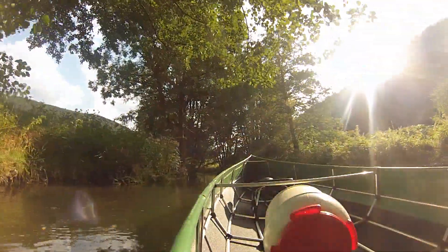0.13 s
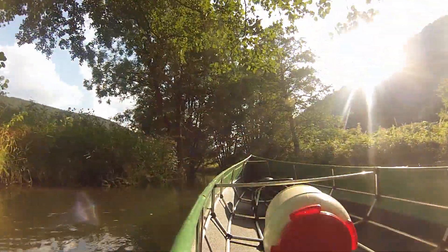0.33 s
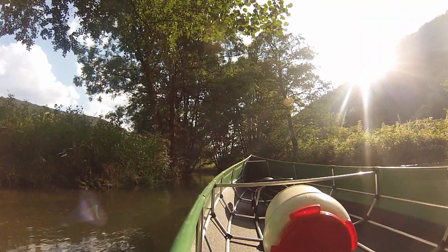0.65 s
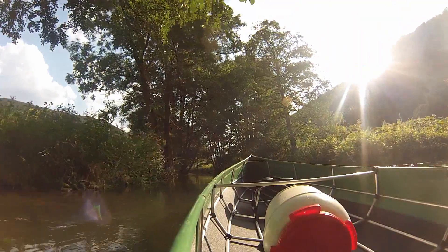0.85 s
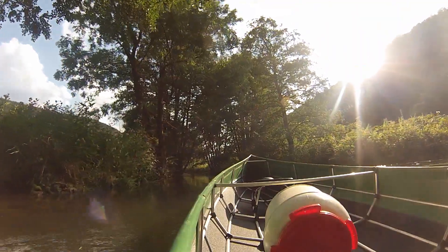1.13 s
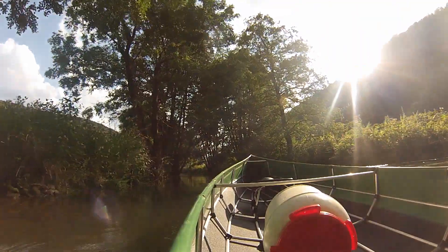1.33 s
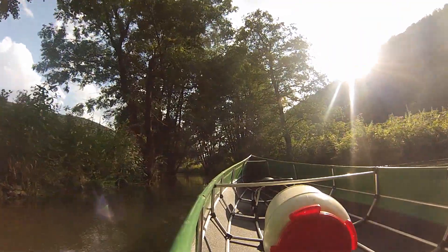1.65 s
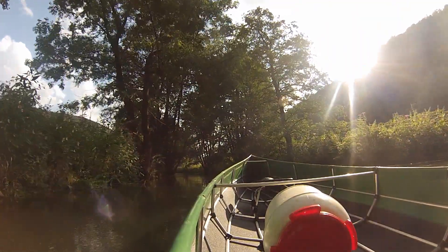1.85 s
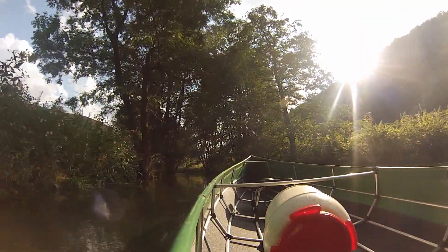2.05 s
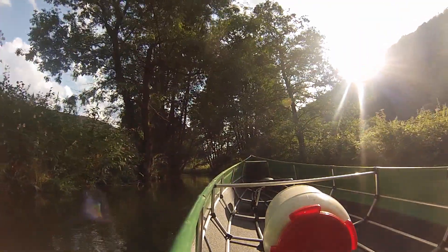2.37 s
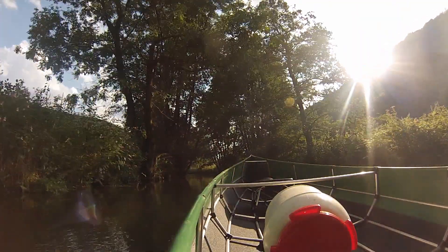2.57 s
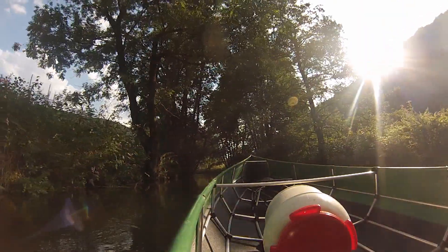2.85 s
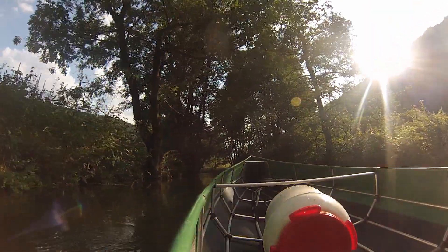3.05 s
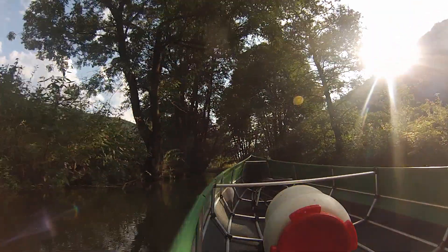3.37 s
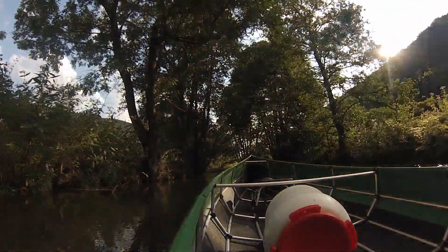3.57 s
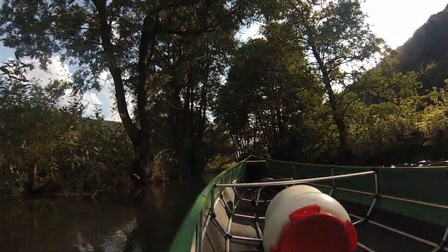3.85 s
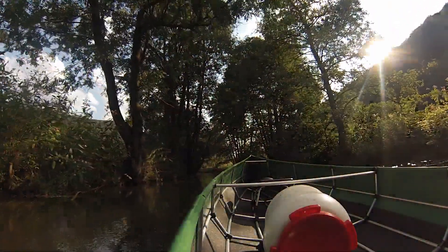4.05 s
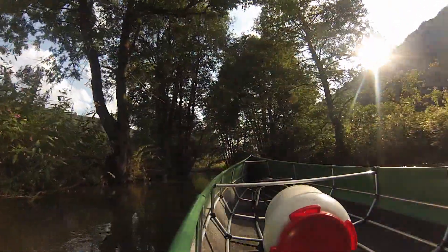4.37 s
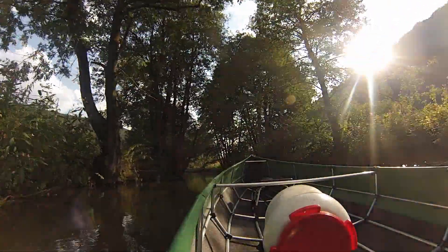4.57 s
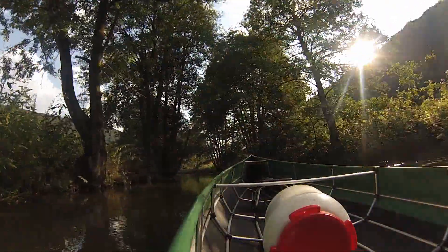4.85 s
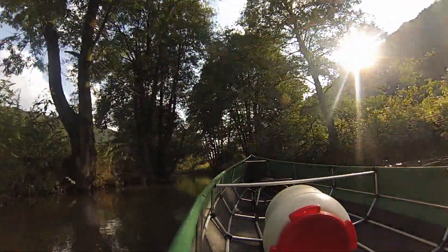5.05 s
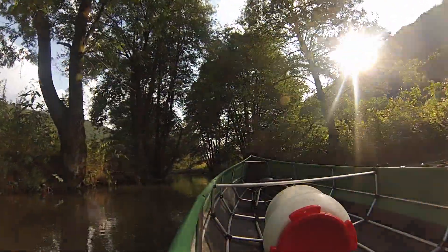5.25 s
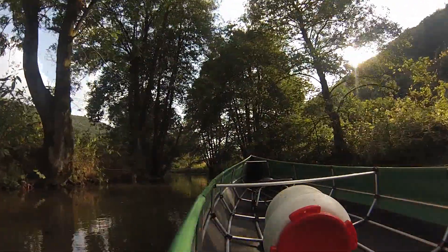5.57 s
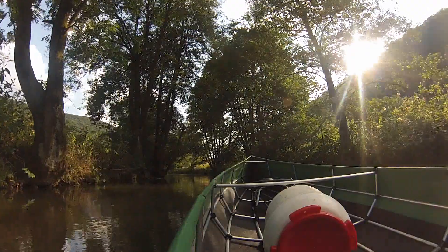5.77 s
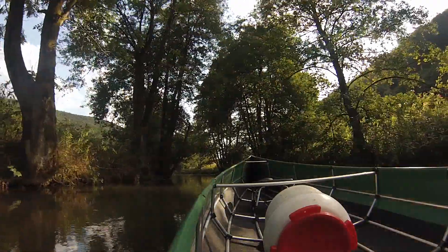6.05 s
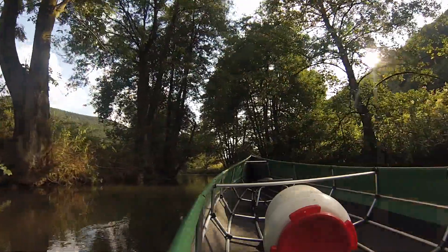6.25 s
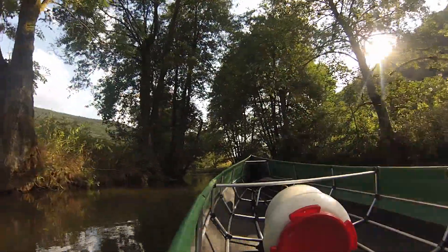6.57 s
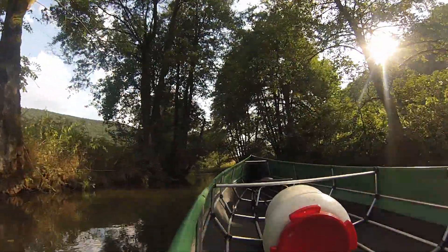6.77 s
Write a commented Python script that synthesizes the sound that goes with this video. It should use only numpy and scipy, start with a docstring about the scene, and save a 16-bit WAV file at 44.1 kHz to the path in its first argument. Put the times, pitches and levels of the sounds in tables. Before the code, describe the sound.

Over a faint steady hiss, a hollow boat flexes with deep rumbling shudders and watery booms. Small dry ticks, brief creaks, bubble plips and light paddle splashes come irregularly. The paddle raps the hull sharply around three seconds, then quieter water follows, and a heavier dull knock lands near the end as a distant motor's throbbing hum swells. The microphone sits in the boat, outdoors on a calm river.

```python
"""A faint steady hiss opens the scene, with a canoe flexing on a calm river and water washing along it.
Shoves of water boom in its bottom, fittings tick and creak, bubbles plip and the blade swishes.
The paddle gives the hull two loud knocks among fainter ones; a far engine hums and slowly grows louder.
Boat sounds are ringing modes set off by blows, contacts or slips; water and hiss are coloured noise.
The engine adds exhaust lines to a throbbing whirr."""
import sys
import numpy as np
from scipy import signal
from scipy.fft import rfft, irfft, next_fast_len
from scipy.io import wavfile
from scipy.ndimage import map_coordinates

SR = 44100
rng = np.random.default_rng(int(sys.argv[2]) if len(sys.argv) > 2 else 0)


def file_out(sig):
    """Save sig as 16-bit WAV at sys.argv[1]."""
    # one column per channel
    cols = np.atleast_2d(sig).T
    # limit, then scale
    lim = np.clip(cols, -1, 1)
    pcm = np.round(lim * 32767).astype(np.int16)
    wavfile.write(sys.argv[1], SR, pcm)


N = 305172  # length of the scene in samples


def amp(db):
    """Decibels to gain."""
    return 10 ** (np.asarray(db) / 20)


def unit(x):
    """Scale to rms 1."""
    return x / np.sqrt(np.mean(x ** 2) + 1e-20)


def clock(count):
    """Seconds for a run of samples."""
    return np.arange(count) / SR


def curves(rows):
    """One value per sample for each column after the time."""
    seconds, *columns = np.transpose(rows)
    return [np.interp(clock(N), seconds, column) for column in columns]


def colour(points, hz):
    """Gain of (Hz, dB) points joined on a log frequency axis."""
    point_hz, db = np.transpose(points)
    return amp(np.interp(np.log(hz + 1), np.log(point_hz + 1), db))


def resonances(modes, hz):
    """Causal response of (Hz, width in Hz, dB) resonances."""
    return sum(amp(db) * 1j * hz * width / (centre ** 2 - hz ** 2 + 1j * hz * width)
               for centre, width, db in modes)


def band(hz, centre_hz, share):
    """A steep-sided band from a squared resonance, whose width is a share of its centre."""
    return resonances([(centre_hz, share * centre_hz, 0)], hz) ** 2


def filtered(x, response):
    """Shape x by a response of frequency."""
    size = next_fast_len(len(x) + SR // 4)  # spare room for the ringing
    spectrum = rfft(x, size) * response(np.fft.rfftfreq(size, 1 / SR))
    return irfft(spectrum, size)[:len(x)]


def noise(response):
    """Coloured noise of rms 1."""
    return unit(filtered(rng.standard_normal(N), response))


def wobble(rate):
    """A smooth random curve, rate knots a second."""
    knots = rng.standard_normal(int(N * rate / SR) + 4)
    return map_coordinates(knots, [clock(N) * rate])


def add(track, s, sound):
    """Mix a sound in at time s."""
    start = max(round(s * SR), 0)
    track[start:start + len(sound)] += sound[:max(N - start, 0)]


def ring(modes, cutoff_hz, rise_cycles, detune):
    """One blow: modes swell within about a cycle and die; soft contact spares the high ones."""
    t, out = clock(SR // 2), 0
    for k, (hz, db, t60) in enumerate(modes):
        strength = amp(db + rng.normal()) / np.hypot(1, (hz / cutoff_hz) ** 2)
        swell = 1 - np.exp(-t * hz / rise_cycles)
        phase = 2 * np.pi * hz * (1 + detune * rng.normal()) * t
        sign = (-1) ** k  # neighbouring modes start in opposite directions
        out = out + sign * strength * swell * amp(-60 * t / t60) * np.sin(phase)
    return out


# Colour of the steady hiss. Each row: frequency in Hz, relative density in dB per Hz.
HISS_COLOUR = [(150, 5), (250, -0.5), (320, -2.5), (380, 13.5), (480, -7), (850, -1), (1250, 1.5),
               (1520, -2), (1750, -3), (2400, -6.5), (4000, -8.5), (8000, -12), (12500, -13)]


def hiss():
    """Steady coloured noise, a faint floor under everything."""
    return amp(-77.5) * noise(lambda hz: colour(HISS_COLOUR, hz))


# Pushes that set the whole boat flexing.
# Each row: start in seconds, level in dB, rise in seconds, decay t60 of the flexing in seconds.
PUSHES = [(0.0, -54, 0.051, .65), (.38, -61.5, 0.088, 0.78), (.75, -41, .11, 1.2),
          (1.181, -34, 0.016, 1.44), (2.045, -34.5, 0.026, 1.01), (2.78, -45.5, 0.29, 1.2),
          (3.11, -33, 0.053, 1.33), (3.3, -40, .05, 1.46), (4.2, -50, 0.076, 0.83), (4.68, -61.5, .08, .9),
          (5.5, -57, 0.13, 1), (6.2, -52, 0.15, 0.87), (6.466, -35, 0.076, 0.83)]
# Colour of the water along the hull. Each row: frequency in Hz, relative density in dB per Hz.
WASH_COLOUR = [(25, -9), (60, 2), (110, 3.5), (200, -5.5), (380, -12.5), (600, -14.5), (1200, -38.5),
               (4000, -82)]
FLEX_HZ, FLEX_IDLE_DB = 27.84, -71.5  # mean bending pitch; typical level on the calm current
TWIST_HZ, TWIST_DB, TWIST_T60_S = 44, -2, 0.21  # short-lived second mode; level relative to the push
TWIST_RISE_S = 0.027  # pushes rising slower than this hardly excite the twist
WASH_IDLE_DB, WASH_FOLLOW_DB = -72.5, -33  # wash at rest; wash relative to the flexing


def sway(s, rise_s, t60):
    """Envelope of one push: a straight rise, then a free decay."""
    t = clock(N) - s
    return np.clip(t / rise_s, 0, 1) * amp(-60 * np.maximum(t - rise_s, 0) / t60)


def swing(hz):
    """A boat mode as a sine of rms 1 whose pitch wanders by about 3 percent."""
    phase = 2 * np.pi * np.cumsum(hz * (1 + 0.0308 * wobble(5.9))) / SR
    return np.sqrt(2) * np.sin(phase)


def shudder():
    """Each push bends the whole boat, an abrupt one also twists it; water washes along the hull."""
    idle = amp(FLEX_IDLE_DB + 3.2 * wobble(7.3))
    power, twist = idle ** 2, 0
    for s, db, rise_s, t60 in PUSHES:
        power = power + (amp(db) * sway(s, rise_s, t60)) ** 2
        abruptness = 1 / np.hypot(1, rise_s / TWIST_RISE_S)
        twist = twist + amp(db + TWIST_DB) * abruptness * sway(s, rise_s, TWIST_T60_S)
    flex = np.sqrt(power)
    lapping = amp(2 * wobble(12))
    wash = noise(lambda hz: colour(WASH_COLOUR, hz)) * lapping
    wash_level = amp(WASH_IDLE_DB) + amp(WASH_FOLLOW_DB) * flex
    return flex * swing(FLEX_HZ) + twist * swing(TWIST_HZ) + wash * wash_level


# Pace of the engine. Each row: time in seconds, mean firings a second.
FIRING = [(0, 43), (5.3, 43), (5.8, 42.3), (6.92, 41.9)]
# Level of the exhaust hum. Each row: time in seconds, level in dB.
EXHAUST_LEVEL = [(0, -93), (3.5, -80.5), (4.2, -73), (4.8, -69.5), (5.35, -66), (5.8, -61), (6.3, -57),
                 (6.92, -53.5)]
# Exhaust lines. Each row: multiple of the firing rate, relative level in dB.
EXHAUST_LINES = [(1, -12.5), (2, -4), (3, 1.5), (4, -22.5), (6, -27), (7, -34), (9, -25.5), (10, -33.5),
                 (11, -31.5)]
# Level of the whirr. Each row: time in seconds, level in dB.
WHIRR_LEVEL = [(0, -86.5), (2.5, -78), (3.8, -80), (4.5, -76), (5.2, -70.5), (5.55, -66.5), (6, -68),
               (6.3, -68.5), (6.92, -65)]
# Broad colour of the whirr. Each row: frequency in Hz, relative density in dB per Hz.
WHIRR_COLOUR = [(100, 5), (250, -8), (450, -7.5), (750, -16.5), (1250, -10), (1550, -4.5), (2100, -9),
                (2800, -14), (4200, -20.5), (6500, -25.5), (9000, -34), (13000, -40)]
# Resonances of the whirr. Each row: frequency in Hz, width in Hz, dB relative to the broad colour.
WHIRR_PEAKS = [(1533, 126, 7), (2370, 150, 4.5), (2900, 77, -2.5), (3585, 190, 6), (5030, 190, 7.5),
               (6150, 240, 6)]


def engine():
    """A far engine: low exhaust lines and a whirr that throbs with every firing."""
    rate, = curves(FIRING)
    hum_db, = curves(EXHAUST_LEVEL)
    whirr_db, = curves(WHIRR_LEVEL)
    phase = 2 * np.pi * np.cumsum(rate * (1 + 0.0019 * wobble(7.8))) / SR
    hum = 0
    for multiple, db in EXHAUST_LINES:
        line = np.sin(round(multiple) * phase + rng.uniform(0, 2 * np.pi))
        hum = hum + amp(db + 0.36 * wobble(5)) * np.sqrt(2) * line
    whirr = noise(lambda hz: colour(WHIRR_COLOUR, hz)
                  * np.hypot(1, np.abs(resonances(WHIRR_PEAKS, hz))))
    throb = unit(1 + .7 * ((1 + np.cos(phase)) / 2) ** 4)  # one narrow pulse per firing
    return amp(hum_db) * hum + amp(whirr_db + 1.27 * wobble(14)) * throb * whirr


# Water shoving the bottom. Each row: start in seconds, level in dB, base pitch in Hz, base t60 in seconds.
THUMPS = [(0.122, -56.5, 150, .08), (0.738, -59, 135, 0.12), (0.869, -39, 114.4, 0.087),
          (1.191, -36, 104, 0.11), (1.232, -36.5, 115.5, 0.11), (2.059, -38, 87.6, 0.12),
          (2.101, -39, 105.5, 0.13), (2.532, -39.5, 126.6, 0.066), (3, -39.5, 109.5, 0.064),
          (3.123, -34.5, 134, 0.12), (3.192, -55.5, 152, 0.2), (3.337, -35.5, 133.6, 0.14),
          (3.381, -33, 135, 0.066), (4.159, -56.5, 253, 0.1), (4.625, -63.5, 253, 0.21),
          (5.099, -50, 109.5, 0.092), (6.473, -36.5, 149, 0.11), (6.522, -33, 109.7, 0.17)]
# The wet bottom panels. Each row: multiple of the base pitch, relative level in dB, multiple of the base t60.
BOTTOM = [(.42, -2, 2), (0.681, -7.5, 2.8), (1, 3, 1.27), (1.249, -2.5, 0.52), (1.6, -8, 1.02),
          (2.399, -19.5, 1.2)]


def thumps():
    """Each shove of water booms in the bottom, whose pitch and ring vary with the water load."""
    out = np.zeros(N)
    for s, db, hz, t60 in THUMPS:
        modes = [(hz * ratio, level, t60 * share) for ratio, level, share in BOTTOM]
        add(out, s, amp(db) * ring(modes, cutoff_hz=490, rise_cycles=0.46, detune=0.072))
    return out


# Ticks of fittings and drops on the boat.
# Each row: start in seconds, level in dB, centre in Hz, gain of the bright snap band in dB.
TICKS = [(0.1227, -51, 1900, -9), (.5435, -62, 1680, -21), (0.6061, -61, 1650, -24),
         (.738, -61, 1970, -3.5), (.8026, -64, 1900, -14), (.821, -52.5, 1880, -10),
         (0.852, -60, 1900, -14), (.872, -63, 1930, -16), (.891, -63.5, 1830, -16),
         (1.1687, -67.5, 1310, -20), (1.1979, -46, 1770, -24), (1.237, -69, 2180, -12),
         (1.246, -64, 2100, -11), (1.5133, -52.5, 1260, -11), (1.535, -54, 1250, -7),
         (1.554, -67, 1190, -20), (1.5724, -65, 1160, -18), (1.684, -72, 2500, -17),
         (1.7264, -68, 1140, -20), (2.0656, -50.5, 1550, -14), (2.5333, -57.5, 1670, -10),
         (2.9978, -56.5, 2100, -17), (3.3267, -58, 1300, -9), (3.3405, -56, 2080, 2),
         (3.354, -57, 2300, -7), (3.3832, -58.5, 2330, -14), (3.393, -60, 2210, -13),
         (3.453, -63.5, 1600, -17), (3.5848, -61.5, 1095, -22), (3.6245, -65, 1170, -22),
         (3.8151, -63, 2190, -20), (3.8416, -60, 2150, -8), (4.1557, -51.5, 1120, -16),
         (5.0825, -51, 1460, -7.5), (5.3042, -59.5, 1560, -6), (6.4656, -56.5, 1470, 1),
         (6.522, -53.5, 2320, -11), (6.5352, -56.5, 2400, -12), (6.8292, -62, 1850, -23)]
# The rail and its fittings, also rung by creaks and spray.
# Each row: frequency in Hz, width in Hz, relative level in dB.
RAIL = [(1066, 90, 5.5), (1265, 114, 10), (1479, 68, 10), (1840, 114, 8.5), (2040, 110, 4.5),
        (2333, 67, -4), (2840, 62, -21), (3300, 200, -6), (4640, 430, -40.5)]
TICK_T60_S = 0.026  # how fast the contacts of one tick die away
STRAY_DB, STRAY_HZ, STRAY_SNAP_DB = -74, 1470, -16  # typical faint tick at a random moment


def ticks():
    """Tiny clusters of contacts ring the rail; the level is their energy spread over 5 ms."""
    out, t = np.zeros(N), clock(SR // 8)
    strays = []
    for place in rng.random(size=10):
        stray_db = STRAY_DB + 2 * rng.normal()
        stray_hz = STRAY_HZ * np.exp(0.22 * rng.normal())
        strays.append((place * N / SR, stray_db, stray_hz, STRAY_SNAP_DB))
    for s, db, centre_hz, snap_db in TICKS + strays:
        def body(hz):
            """The rail, struck in a main band and a bright snap band."""
            snap = amp(snap_db) * band(hz, 4340, share=0.31)
            return resonances(RAIL, hz) * (band(hz, centre_hz, share=0.97) + snap)
        contacts = rng.standard_normal(len(t)) * amp(-60 * t / TICK_T60_S)
        tick = filtered(contacts, body)
        add(out, s, amp(db) * tick / np.linalg.norm(tick) * np.sqrt(.005 * SR))
    return out


# Stick-slip creaks, one list each. Each row: time in seconds, mean slips a second, relative level in dB.
CREAKS = [
    [(.312, 46, -56), (.36, 44, -63), (.378, 49, -53.5), (.41, 124, -57.5), (.47, 125, -56),
     (.505, 65, -54), (.53, 45, -57)],
    [(2.882, 215, -66), (2.9, 380, -53.5), (2.912, 259, -53.5)],
    [(4.187, 68, -64), (4.255, 82, -54.5), (4.3, 110, -75)],
    [(4.553, 91, -64), (4.585, 82, -50.5), (4.61, 93, -68)],
]
# Where each creak rings most, in the same order: centre in Hz.
CREAK_HZ = [1645, 2330, 1050, 1050]


def creaks():
    """A fitting under load slips in quick, nearly regular jerks that ring the rail."""
    out, t = np.zeros(N), clock(N)
    for rows, centre_hz in zip(CREAKS, CREAK_HZ):
        rate, db = curves(rows)
        active = (t >= rows[0][0]) & (t <= rows[-1][0])
        uneven = amp(.5 * wobble(50))
        count = np.ceil(np.cumsum(active * rate * uneven) / SR)
        slips = np.diff(count, prepend=0) * amp(db + 1.1 * wobble(120))  # one impulse per slip
        out += filtered(slips, lambda hz: resonances(RAIL, hz) * band(hz, centre_hz, share=0.5))
    return amp(25.5) * out


# Bubbles. Each row: start in seconds, level in dB, starting pitch in Hz, t60 in seconds.
BUBBLES = [(0.34, -53.5, 1600, 0.035), (0.7267, -52.5, 1190, 0.026), (2.141, -64, 1520, .04),
           (3.3399, -50, 1930, 0.022), (3.354, -49, 1910, 0.033), (3.363, -45, 1380, 0.014),
           (3.375, -38, 1800, 0.014), (3.396, -49, 1830, 0.027), (3.976, -61.5, 1790, .06),
           (5.099, -54, 1260, 0.034), (6.522, -50, 1920, 0.025), (6.5368, -40.5, 1854, 0.029)]


def bubbles():
    """Trapped air rings and rises in pitch as it nears the surface."""
    out, t = np.zeros(N), clock(SR // 8)
    for s, db, hz, t60 in BUBBLES:
        pitch = hz * (1 + 0.069 * np.minimum(t / t60, 1))
        phase = 2 * np.pi * np.cumsum(pitch) / SR
        onset = 1 - np.exp(-t / 0.0011)
        add(out, s, np.sqrt(2) * amp(db - 60 * t / t60) * onset * np.sin(phase))
    return out


# The blade swishing through water. Each row: middle in seconds, spray level in dB,
# half-length in seconds, spray centre in Hz, slosh in dB relative to the spray.
SWISHES = [(0.757, -75, 0.057, 1320, 5.5), (1.04, -77.5, 0.052, 1730, -15), (1.23, -69.5, 0.028, 2080, 3.5),
           (2.05, -65.5, 0.045, 1770, -6), (2.095, -65, 0.041, 1970, 3.5), (2.765, -74.5, 0.11, 1280, -24),
           (3.018, -70, 0.012, 3080, 0), (3.096, -68, 0.0062, 1650, 0.5), (3.357, -71, 0.038, 2350, 5.5),
           (3.954, -81, 0.19, 1870, 2.5), (4.229, -79.5, 0.08, 1878, 9.5), (4.653, -73.5, 0.059, 1600, 0.5),
           (5.465, -65.5, 0.036, 1620, 0.5)]
# Water against the hull. Each row: frequency in Hz, width in Hz, relative level in dB.
SLOSH = [(230, 44, -1.5), (377, 82, 2.5), (617, 28, -1)]


def swishes():
    """The blade tears the surface: droplets patter on the rail and the hull sloshes under them."""
    out = np.zeros(N)
    t = clock(SR // 2) - .25  # seconds from the middle of the swish
    for s, db, half, centre_hz, slosh_db in SWISHES:
        def patter(hz):
            """Droplets heard directly and through the rail, softened at the top."""
            rail = 0.41 + np.abs(resonances(RAIL, hz))
            return band(hz, centre_hz, share=0.95) * rail / (1 + (hz / 4800) ** 4)
        swell = np.exp(-(t / half) ** 2)
        drops = rng.standard_normal(len(t)) * (rng.random(len(t)) < 900 / SR)  # about 900 a second
        spray = unit(filtered(drops, patter))
        slosh = unit(filtered(rng.standard_normal(len(t)),
                              lambda hz: resonances(SLOSH, hz) / (1 + (hz / 1200) ** 2)))
        add(out, s + t[0], amp(db) * swell * (spray + amp(slosh_db) * slosh))
    return out


# Paddle against the hull. Each row: start in seconds, level in dB, contact cut-off in Hz (high = hard),
# ring length (1 = free hull), off-centre tilt in dB.
KNOCKS = [(2.534, -54.5, 1500, 0.85, 1), (2.9973, -57, 1810, 0.66, -3), (3.1188, -27, 1970, 0.97, 2),
          (4.158, -52, 2500, 0.46, -4.5), (5.098, -60.5, 1400, 1, 2.5), (6.4669, -23, 700, 1, 0.5)]
# The hull's ring. Each row: mean frequency in Hz, mean relative level in dB, t60 of the free hull in seconds.
HULL = [(247, -9.5, 0.14), (372.4, 1.5, 0.094), (506.6, -1, 0.095), (663, -9.5, 0.061), (1025, -4, 0.017),
        (1266, -2.5, 0.031), (1560, -29, .045), (1760, -13.5, 0.037), (2200, -25, 0.028),
        (2430, -24.5, 0.032)]


def knocks():
    """The paddle shaft strikes the hollow hull; an off-centre blow favours every other mode."""
    out = np.zeros(N)
    for s, db, cutoff_hz, length, side_db in KNOCKS:
        modes = [(hz, level - (-1) ** k * side_db, t60 * length)
                 for k, (hz, level, t60) in enumerate(HULL)]
        add(out, s, amp(db) * ring(modes, cutoff_hz, rise_cycles=.9, detune=.004))
    return out


def banks(x, t60):
    """The wooded banks scatter back a diffuse tail: decaying noise of unit energy."""
    t = clock(SR // 2)
    tail = rng.standard_normal(len(t)) * amp(-60 * t / t60)
    return signal.fftconvolve(x, tail / np.linalg.norm(tail))[:N]


def scene():
    """Boat, water and engine over a steady hiss; the banks answer the boat's small sounds weakly."""
    boat = knocks() + ticks() + creaks() + bubbles()
    echo = amp(-18.0) * banks(boat, t60=0.23)
    return (hiss() + shudder() + engine() + thumps() + swishes() + boat + echo)[None]


def record(dry):
    """Nothing is kept above the band limit."""
    return filtered(dry[0], lambda hz: hz < 12750)[None]


dry = scene()
out = record(dry)
file_out(out)
```